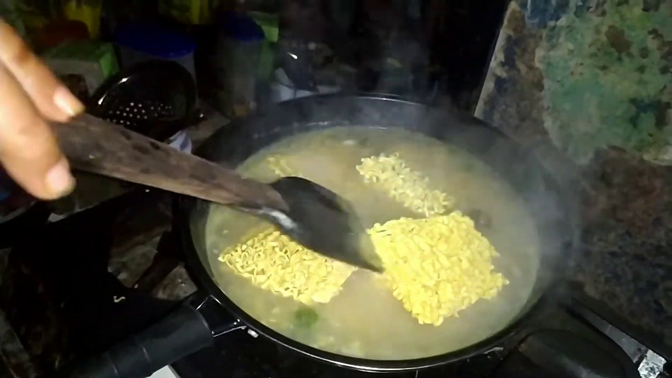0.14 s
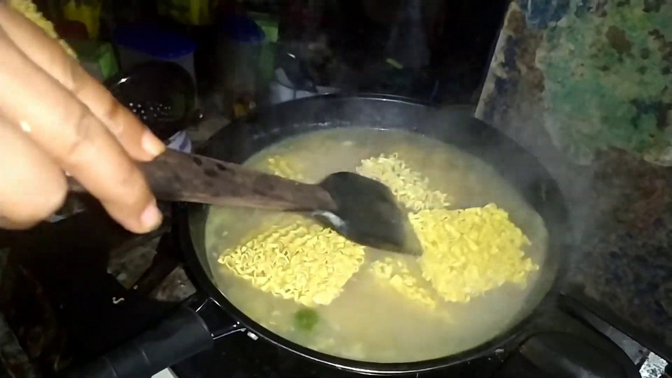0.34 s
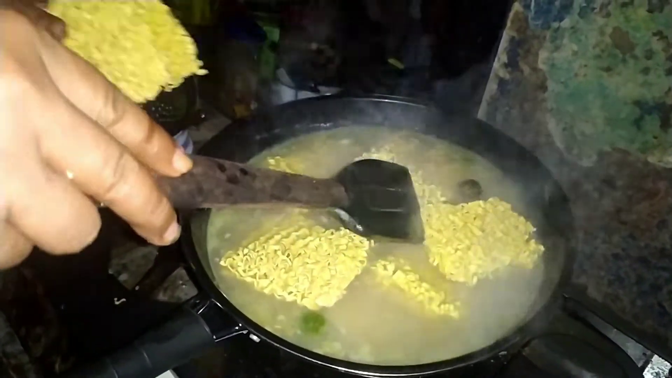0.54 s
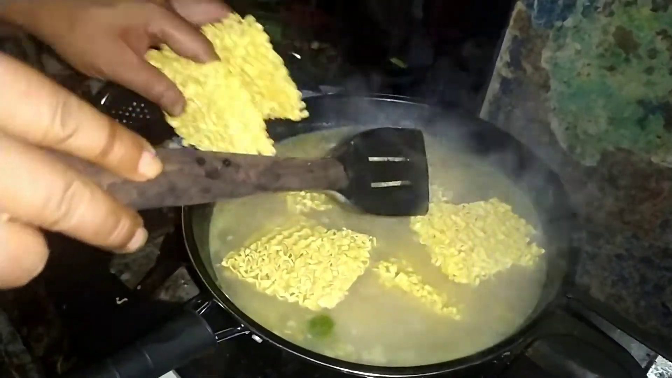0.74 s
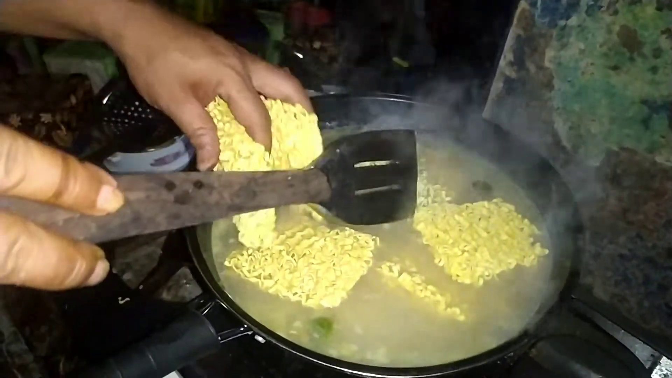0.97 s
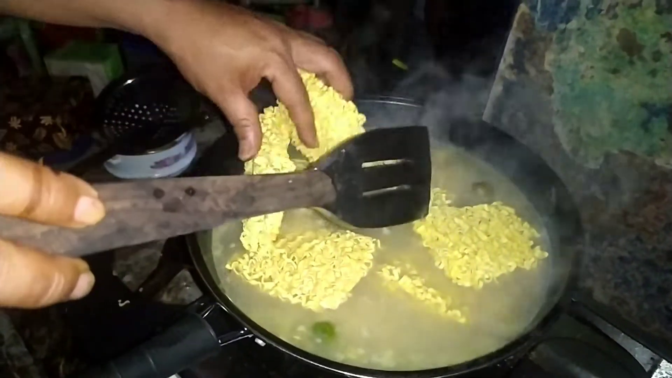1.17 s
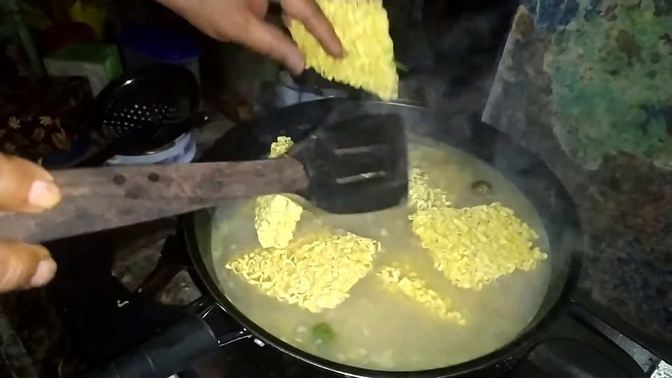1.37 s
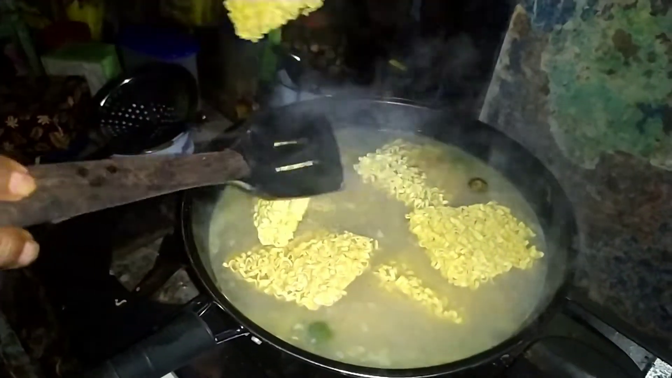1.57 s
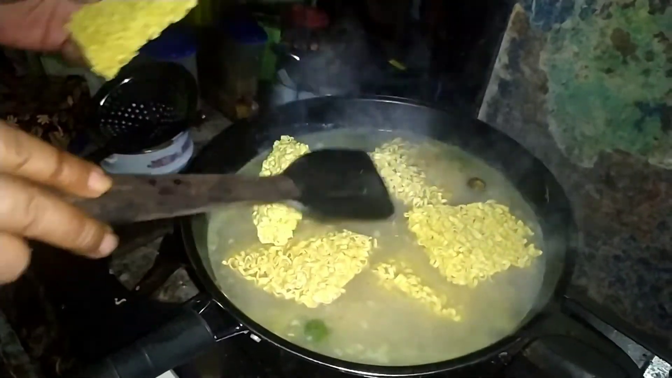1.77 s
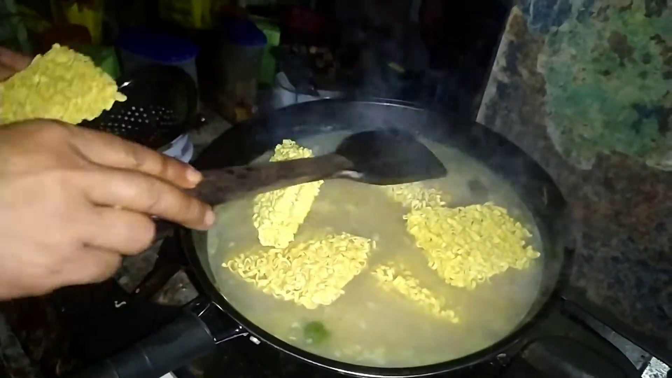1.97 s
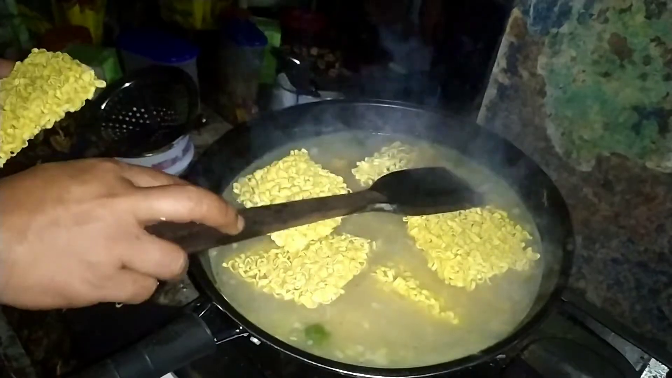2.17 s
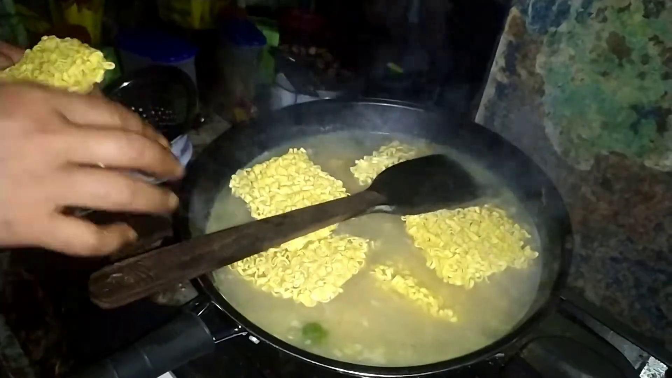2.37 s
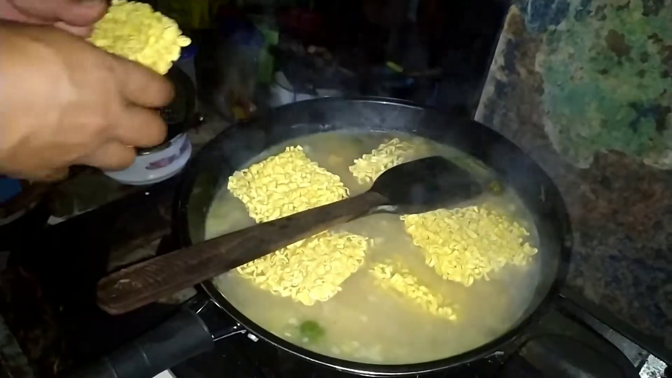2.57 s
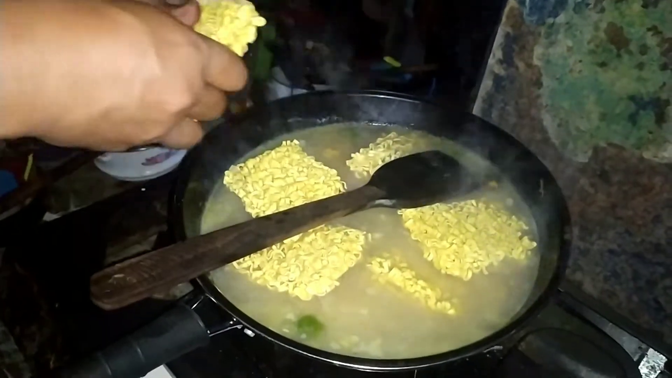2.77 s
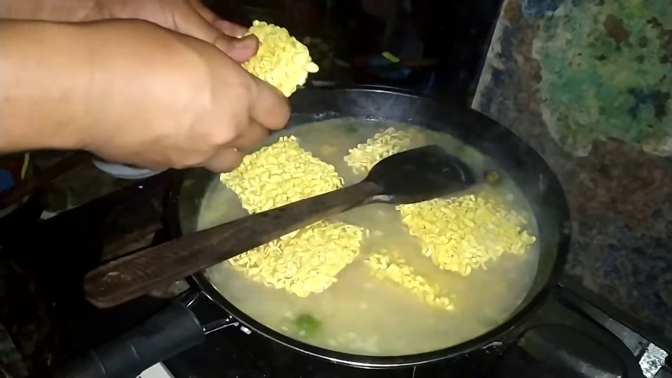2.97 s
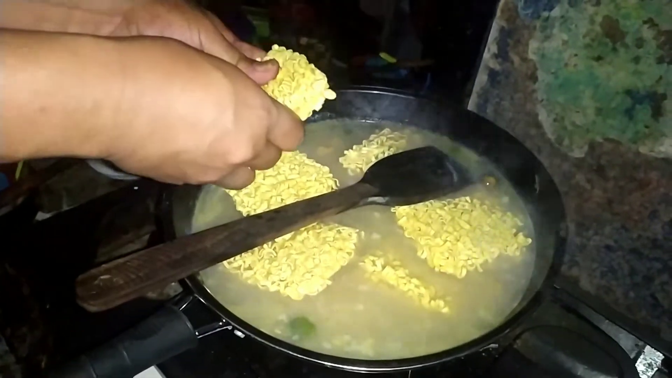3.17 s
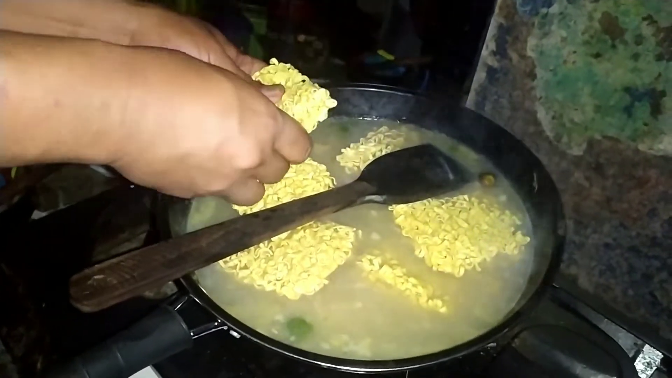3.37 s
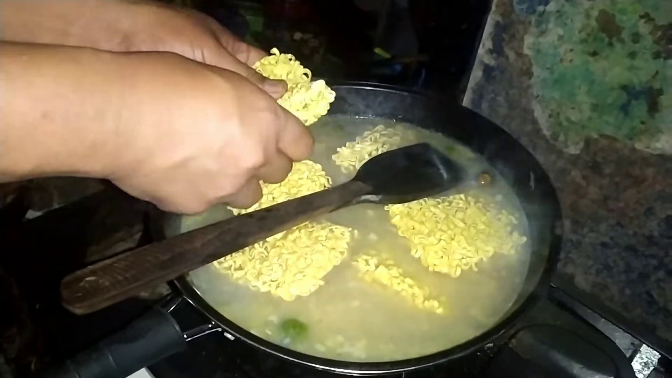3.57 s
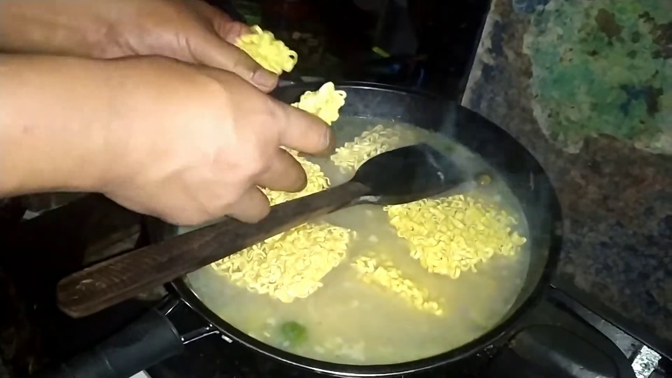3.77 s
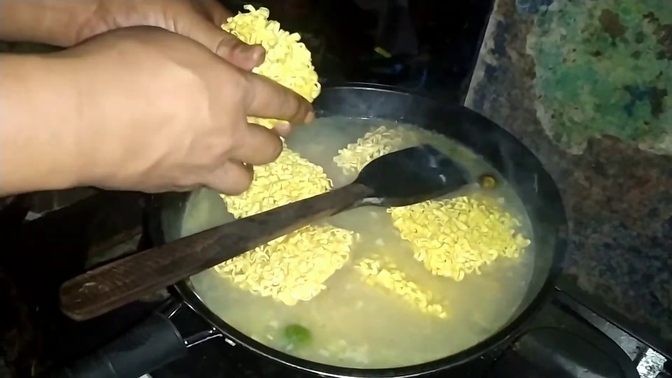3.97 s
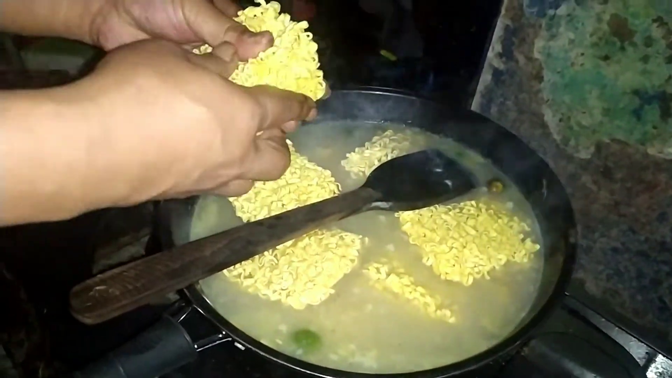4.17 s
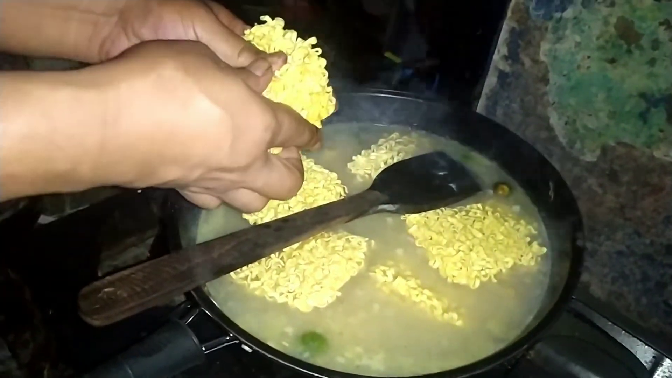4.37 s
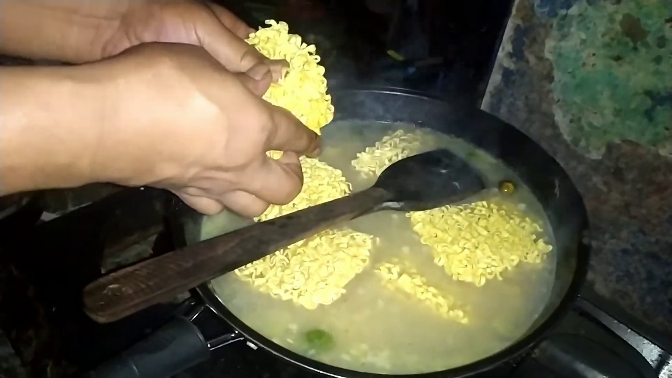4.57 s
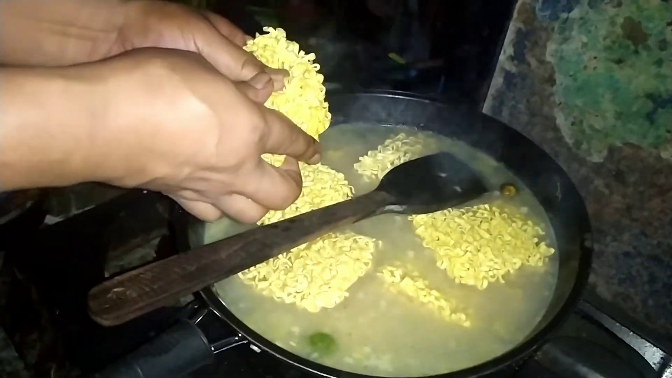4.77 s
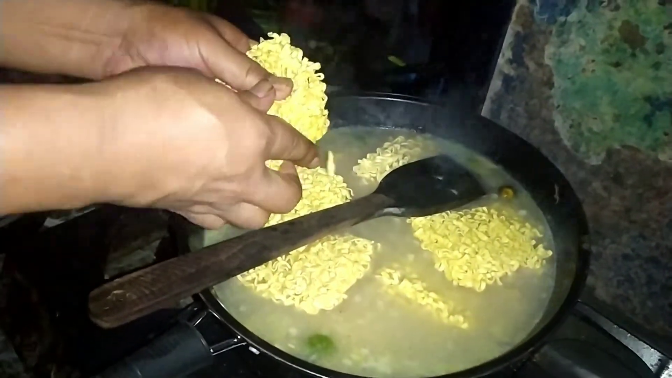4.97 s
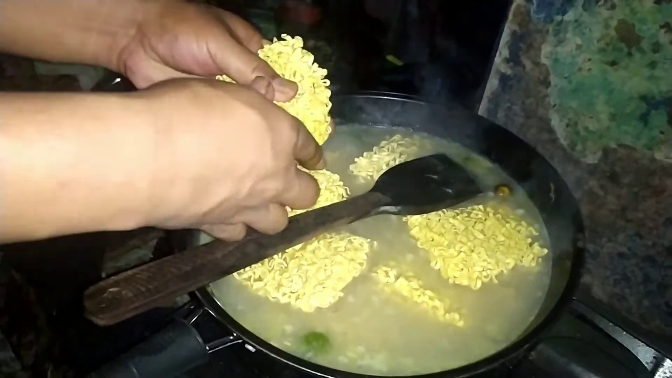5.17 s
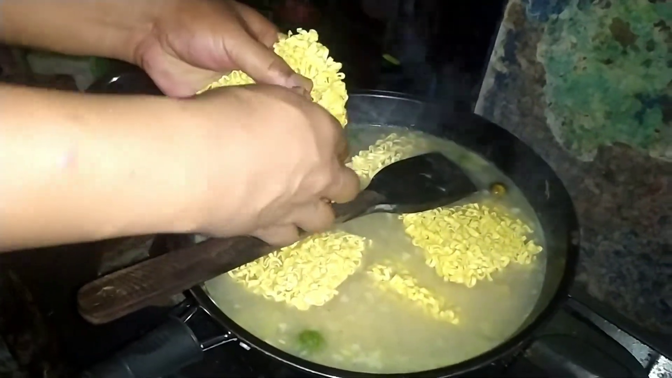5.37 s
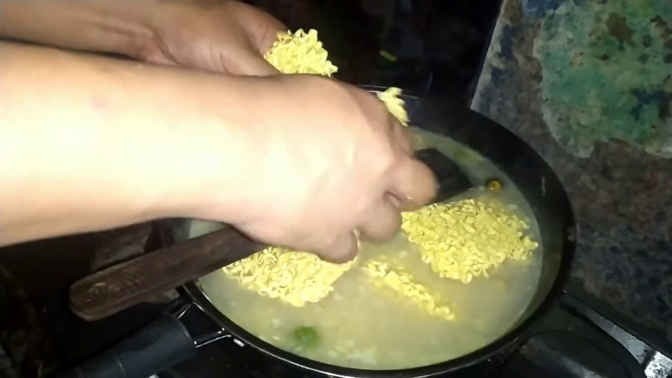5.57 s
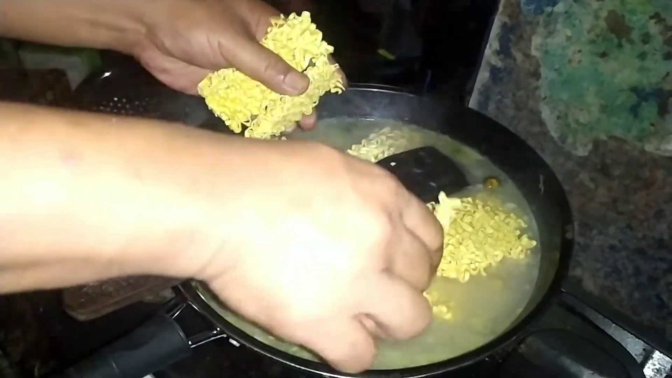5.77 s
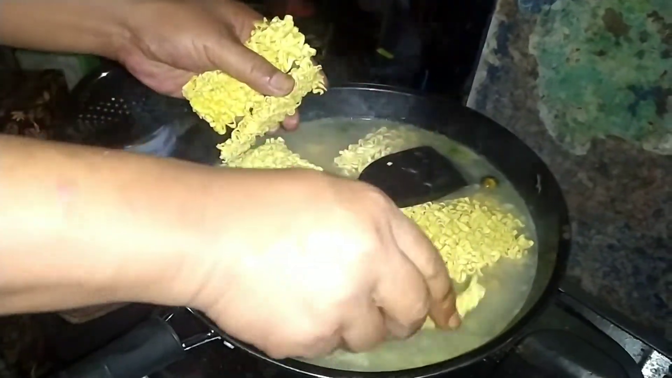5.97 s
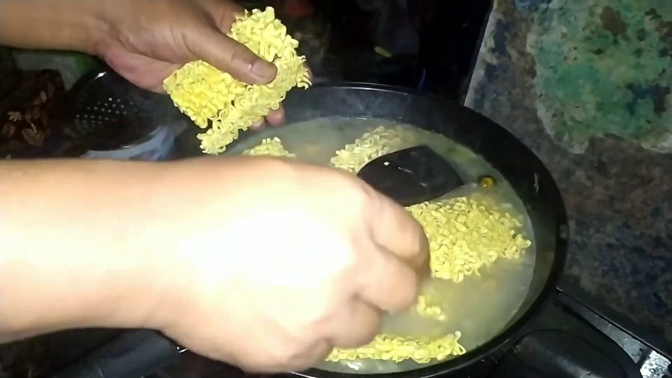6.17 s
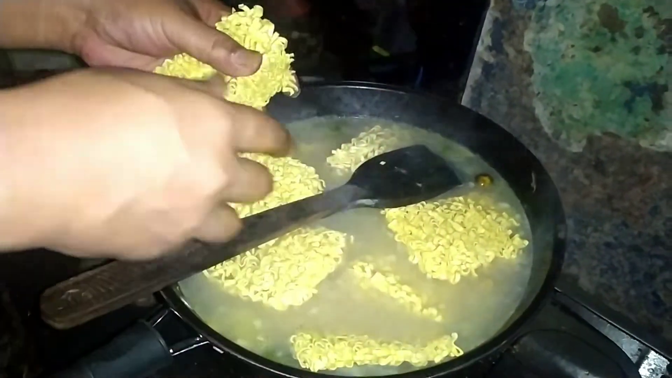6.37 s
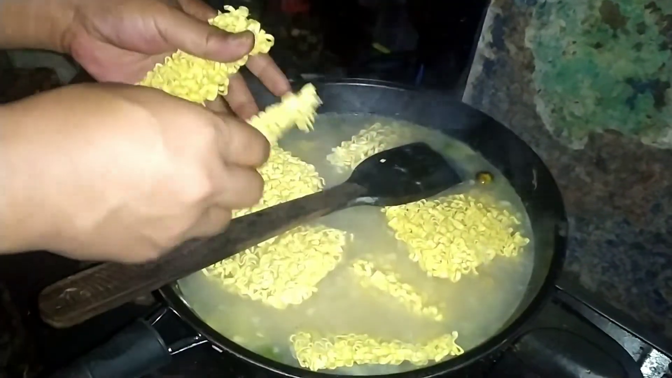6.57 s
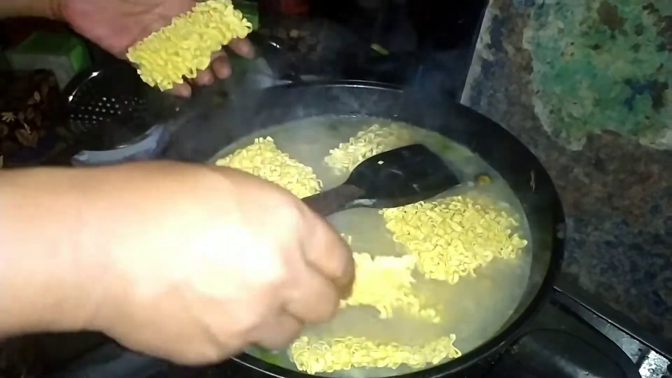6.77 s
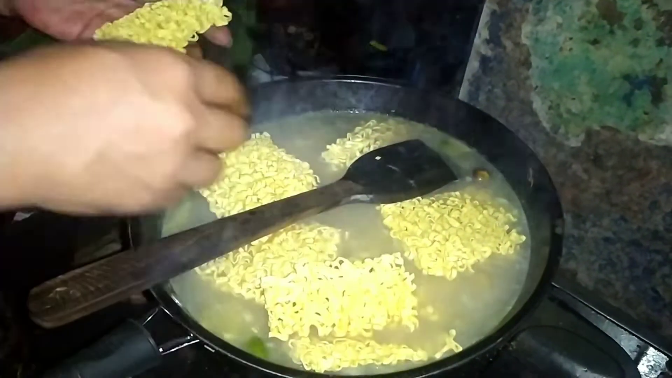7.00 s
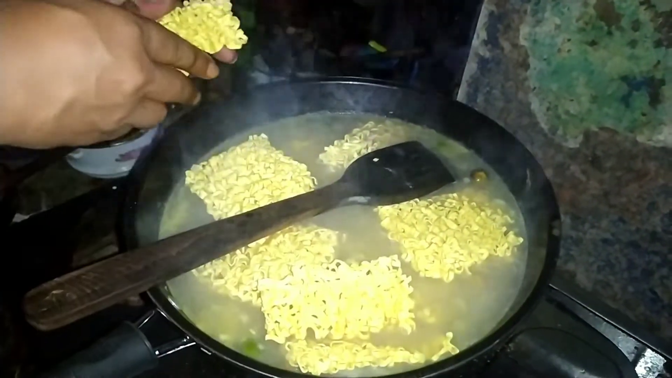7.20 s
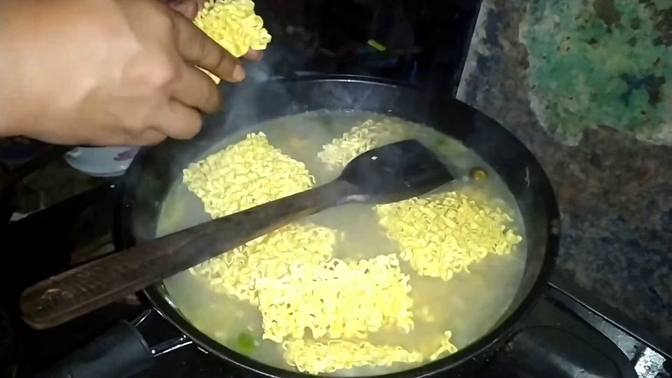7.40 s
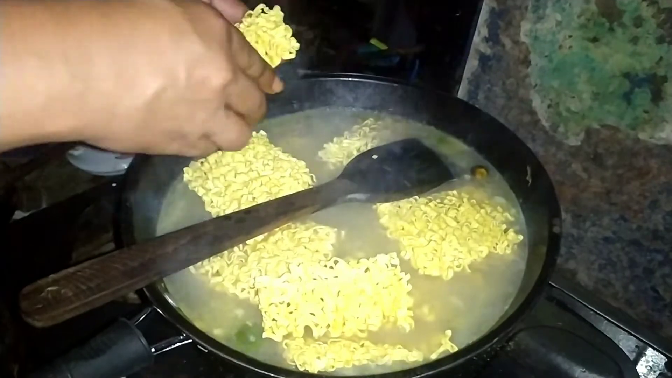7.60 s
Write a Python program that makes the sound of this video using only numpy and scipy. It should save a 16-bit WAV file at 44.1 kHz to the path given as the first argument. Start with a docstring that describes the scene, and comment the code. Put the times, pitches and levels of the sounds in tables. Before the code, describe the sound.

A close handheld microphone in a small hard-walled kitchen picks up a soft gas flame rumble, thin hiss and tiny broth bubbles. One crisp noodle snap comes early, then faint rustles and a light wooden knock on the pan. After three seconds dry noodles break in a dense, loud, bright crackling burst, with smaller breaks later and a last brittle crackle at the end.

```python
"""First a gas flame rumbles and hisses under bubbling broth and a low pan drone; then dry noodles snap.
Hands break the blocks close to a phone: bright noise bursts per strand, random fine crackle between them.
A wooden spatula knocks and drags: impulses and uneven noise ring decaying modes of wood and pan.
Bubbles are rising, fading tones; flame and hiss are fluttering noise bands; kitchen walls add a short tail."""
import sys
import numpy as np
from scipy import signal
from scipy.fft import rfft, irfft, next_fast_len
from scipy.io import wavfile
from scipy.ndimage import uniform_filter1d

SR = 44100
rng = np.random.default_rng(int(sys.argv[2]) if len(sys.argv) > 2 else 0)


def generate_wav(signal):
    """Clip the signal to [-1, 1] and save it as 16-bit WAV at the path in sys.argv[1]."""
    frames = np.transpose(np.atleast_2d(signal))
    scaled = np.clip(frames, -1, 1) * 32767
    pcm = np.round(scaled).astype(np.int16)
    wavfile.write(sys.argv[1], SR, pcm)


N = 337012
LONG = next_fast_len(N)

# Strands that snap singly, and a few faint ticks of the spatula. Each row: start in seconds,
# nominal peak in dB, thickness as relative dB near 2.4 kHz, brightness as relative dB near 13 kHz.
SNAPS_AND_TICKS = [(0.6144, -20.5, -7, -5.5), (1.1456, -51, 14, -10), (1.1958, -50, 10, -4),
                   (1.3064, -48, -10, -9), (1.3173, -47.5, 15, -10), (1.3472, -43, 4.0, -13),
                   (1.7822, -45, 0, -11), (2.9385, -46.5, 4.0, -5), (3.014, -36, 8.0, -6),
                   (3.031, -38.0, -1.0, 7.0), (3.0391, -35, -1, 0.0), (3.0441, -32.5, -6, -6),
                   (3.2271, -28.5, -7, -3), (3.2385, -27.0, -4, -2), (3.268, -38, -3.0, 4.0),
                   (3.2787, -23.5, -6, 2.0), (3.2994, -31.5, 4, 2), (3.3173, -29, 2.0, 0.0),
                   (3.3221, -19.5, -9, 5.0), (3.3285, -35, -9, -1.0), (3.3595, -33.0, 1, -4),
                   (3.3798, -28.5, 6, 1), (3.3935, -25.5, 11, 4), (3.402, -27.0, 2.0, 4.0),
                   (3.4047, -15.5, 1.5, 9), (3.4073, -18, -1.5, 2), (3.41, -17.5, 4, 6),
                   (3.413, -19, -1, 3), (3.415, -14.5, -1, 4), (3.4208, -10, -0.5, 13.5),
                   (3.4289, -30, 1, 8), (3.4866, -31, 5, 9), (3.5063, -38, 6, 7), (3.5403, -39, -3, 9),
                   (4.0377, -46.0, 0, -3.0), (4.0848, -41.0, 18, -1), (4.088, -45, 18, -12.0),
                   (4.1596, -41.0, 7, -1.0), (4.458, -48, 10, 0), (4.4717, -29.5, 2, 6),
                   (4.485, -38, 3, 5.0), (4.7378, -50.0, 5.0, -2), (4.7529, -50.0, -3.0, 1.0),
                   (4.7554, -24.5, -2, 2.0), (4.779, -34, -4, 8), (4.7991, -24, 1, 3.0),
                   (4.8067, -21, -14.0, 13), (4.8398, -29.5, -1, 3), (4.871, -35.5, 6.5, 2.5),
                   (4.885, -37.5, -2, 7.0), (4.897, -44, -3, 4), (4.9783, -48, 12, 13),
                   (4.9898, -35.5, -4, 7.0), (5.1357, -33.5, -7, 10), (5.1415, -34.0, 4, 6),
                   (5.3168, -42, -4.0, 8.0), (5.3208, -40.5, 2, 4), (5.347, -46, 9, 0),
                   (5.4184, -21.5, -14, 14), (5.4275, -42, -3.0, 13), (5.4524, -48, -11, -2.0),
                   (5.4559, -29, 0, 0), (5.4643, -15, 4.5, 15), (5.4736, -32, -4.0, 12.0),
                   (5.4774, -21.5, 1, 4.0), (5.49, -20.5, -6, 13), (5.4896, -19, -6.0, 15),
                   (5.4979, -24, -10, 2.0), (5.501, -27, -2, 7), (5.5147, -23, -8, 4),
                   (5.5248, -21.5, -2, 13), (5.8043, -44, 1.0, 13), (6.1062, -42.5, -17, 3.0),
                   (6.1367, -37.5, 10, -6), (6.1542, -45, 4, 0), (6.9363, -47, 9, 1),
                   (7.0078, -46, 11, -4.0), (7.4419, -41, 1, 6.0), (7.4492, -36.5, 1, 5.0),
                   (7.4668, -28, 1.5, 4), (7.4867, -34, 3.0, 16), (7.5077, -38, 9, 7),
                   (7.5166, -37, 4.0, 6.0), (7.536, -40, -3, 1)]
# Spectrum of breaking noodle. Each row: frequency in Hz, relative density in dB per Hz.
NOODLE_SPECTRUM = [(410, -60), (700, -19.5), (1990, -19), (2700, -7), (4010, -8.5), (4340, -5), (9850, 4),
                   (12800, -0.5), (15400, -4), (16500, -27)]
# Straining hands make the block crackle. Each row: start in seconds, hold in seconds,
# level in dB before the body gain, body gain in dB.
CRUNCHES_BY_HAND = [(0.986, 0.0084, -57.5, 2), (1.123, 0.23, -60, 2.5), (1.672, 0.035, -63, 6.5),
                    (3.009, 0.032, -48, -4), (3.262, 0.105, -42.5, -4.5), (3.39, 0.0088, -41, 5),
                    (3.424, 0.14, -56, -4), (4.034, .002, -56, 8.5), (4.083, .002, -51, 5.5),
                    (4.157, 0.024, -48.5, 6), (4.23, 0.23, -68.5, 0), (4.768, 0.11, -56, -16),
                    (5.454, 0.06, -38, -5.5), (6.12, 0.02, -63, 12.5), (7.441, 0.069, -51, -3.5)]
# Wood meets the pan. Each row: start in seconds, strike drive in dB,
# pan drive in dB re strike, tick drive in dB re strike.
SPATULA_KNOCKS = [(1.348, -54, -2, 13), (2.233, -56, -8, 8), (2.2419, -38.5, -11, 7),
                  (2.278, -63.5, 13.5, -10), (2.4337, -48, -14, 5.5), (2.438, -55.5, 11.5, 7),
                  (2.507, -67, 13.5, -5), (6.124, -53.5, -11, -11), (6.95, -59.5, 7, -10)]
# Modes of the wood. Each row: frequency in Hz, relative level in dB, t60 in seconds.
WOOD_MODES = [(640, -5, 0.05), (960, 8, 0.035), (1400, 4, 0.016), (2390, -1, 0.022)]
# Modes of the pan. Each row: frequency in Hz, relative level in dB, t60 in seconds.
PAN_MODES = [(140, -7, .15), (175, 2, .4), (245, -5, .15)]
# Drags on the pan. Each row: start in seconds, hold in seconds, drone level in dB.
PAN_DRAGS = [(0.18, 0.38, -62), (1.15, 0.044, -51.5), (1.332, 0.016, -49.5), (2.426, 0.025, -47.5)]
# Bubbles stirred up in the broth. Each row: start in seconds, starting pitch in Hz, level in dB.
STIRRED_BUBBLES = [(.153, 890, -51.5), (.19, 700, -57), (.222, 780, -50), (.262, 1010, -57),
                   (.292, 1090, -55), (.3, 1640, -51), (2.505, 1000, -52)]
# Spectrum of flame and hiss. Each row: frequency in Hz, relative density in dB per Hz.
STOVE_SPECTRUM = [(21, -23), (36, 5.5), (65, -2), (139, 2), (238, -6), (292, -8), (406, -8.5), (462, -10.5),
                  (498, -8.5), (873, -13), (1280, -19), (11200, -25.5), (16000, -36)]
# Left-right likeness of the stove. Each row: frequency in Hz, correlation from 0 to 1.
STOVE_LIKENESS = [(40, 0.74), (130, 0.98), (290, 0.9), (640, 0.84), (1400, 0.45), (3000, 0)]
# Room tail by band. Each row: centre in Hz, t60 in seconds, relative level in dB.
ROOM_BANDS = [(318, 0.22, -59), (1610, 0.21, -23), (3600, 0.18, -27), (6800, 0.21, -28.5),
              (14300, 0.19, -30.5)]
# Steep upper limit of the sound. Each row: frequency in Hz, gain in dB.
TREBLE_LIMIT = [(15450, 0), (15650, -20)]

SCATTER_DB = 1.0  # random spread of each snap's level per side
ECHO_S, ECHO_DB = 0.0027, -13  # broth and pan mirror each snap
CRUNCH_ATTACK_S, CRUNCH_FADE_DB_PER_S = 0.0028, 359
DRAG_ATTACK_S, DRAG_FADE_DB_PER_S = 0.0096, 86
SIMMER_COUNT, SIMMER_DB = 300, -70  # small random bubbles, lowest level
FLAME_DB, HISS_DB = -59.5, -64.5
PAN_ROOM_DB = -5  # pan and broth into the room, re noodles
RIGHT_DB = 2.2  # right re left
TOP_HZ = 16600


def snaps(rise_s=0.0004, fall_s=0.0014, crack_s=0.00012, crack_db=-4, after_s=0.005, after_db=-16,
          spike_db=1.7, tint_db=1.5, shared_power=0.6, lag_samples=8):
    """A snap or tick is a few spiky fractures and a shiver, with its own colour and place."""
    out, size, lead = np.zeros((2, N)), 1024, 110  # lead in samples
    t = (np.arange(size) - lead) / SR
    late = np.maximum(t, 0)
    decay = np.exp(-late / fall_s) + undb(after_db) * np.exp(-late / after_s)
    envelope = np.exp(np.minimum(t, 0) / rise_s) * decay
    envelope += undb(crack_db) * np.exp(-np.abs(t) / crack_s)
    loudest = np.sqrt(uniform_filter1d(unit(envelope) ** 2, size=26).max())
    for start_s, db, thick_db, top_db in SNAPS_AND_TICKS:
        tint = list(zip(1500 * 1.27 ** np.arange(11), tint_db * rng.standard_normal(11)))
        both, *own = rng.standard_normal((3, size))
        noise = np.sqrt(shared_power) * both + np.sqrt(1 - shared_power) * np.array(own)
        fractures = envelope * undb(spike_db * rng.standard_exponential(size)) * noise
        fractures[1] = np.roll(fractures[1], rng.integers(-lag_samples, lag_samples + 1))
        tilt = [(2400, thick_db), (7500, 0), (13000, top_db)]
        gains_db = shape(NOODLE_SPECTRUM, size) + shape(tint, size) + shape(tilt, size)
        burst = unit(irfft(rfft(fractures) * causal(gains_db)))
        side_db = db + SCATTER_DB * rng.standard_normal((2, 1))
        add(out, burst / loudest * undb(side_db), start_s + rise_s - lead / SR)
    return out + undb(ECHO_DB) * np.roll(out, int(ECHO_S * SR), axis=1)


def crackle(rate_per_s=1500, spread_db=2.4, fall_s=0.0006, split_hz=9000):
    """Fine strands give way at random, a few louder; body gain weights the part under the split."""
    cracks = (rng.random(N) < rate_per_s / SR) * undb(spread_db * rng.standard_exponential(N))
    envelope = decaying(cracks, fall_s)
    fine = envelope * colour(rng.standard_normal((2, N)), NOODLE_SPECTRUM)
    body = signal.sosfilt(signal.butter(2, split_hz, fs=SR, output="sos"), fine)
    total = 0
    for start_s, hold_s, db, body_db in CRUNCHES_BY_HAND:
        gain = swell(start_s, hold_s, db, CRUNCH_ATTACK_S, CRUNCH_FADE_DB_PER_S)
        total = total + (fine + (undb(body_db) - 1) * body) * gain
    return total / fine.std()


def spatula(wood_db=-6.0, pan_db=-2.0, rattle_s=0.0013, scrape_db=-14.0):
    """Knocks rattle, tick and ring wood and pan; drags drone by uneven slips and scrape dully."""
    start_s, db, low_db, hard_db = np.transpose(SPATULA_KNOCKS)
    blows = np.zeros((3, N))
    blows[:, (start_s * SR).astype(int)] = undb([db, db + low_db, db + hard_db])
    rattle = decaying(blows[2], rattle_s) * rng.standard_normal(N)
    tick = colour(rattle, [(300, 3), (2500, 0.0), (5500, 1.0), (11000, -9.0)])
    rub = rng.standard_normal(N) * undb(1.0 * walk(81.0))
    drone = unit(ring(rub, PAN_MODES))
    scrape = undb(scrape_db) * unit(colour(rub, [(300, -9), (700, 3), (1300, -7), (3000, -16)]))
    pressure = sum(swell(*row, DRAG_ATTACK_S, DRAG_FADE_DB_PER_S) for row in PAN_DRAGS)
    wood = undb(wood_db) * ring(blows[0], WOOD_MODES)
    pan = undb(pan_db) * ring(blows[1], PAN_MODES)
    return wood + pan + tick + (drone + scrape) * pressure


def bubbles(cycles=7.0, glide=0.25, spread_db=2.0):
    """Each bubble is a short tone rising as it fades; small ones come at random throughout."""
    chance = rng.random((SIMMER_COUNT, 3))
    small_s = chance[:, 0] * N / SR
    small_hz = 350 * 5 ** chance[:, 1]
    small_db = SIMMER_DB - spread_db * np.log(chance[:, 2])
    out, t = np.zeros(N), np.arange(1500) / SR
    for start_s, hz, db in [*STIRRED_BUBBLES, *np.c_[small_s, small_hz, small_db]]:
        turns = hz * t
        tone = np.sin(2 * np.pi * turns * (1 + glide * turns / cycles / 2))
        add(out, undb(db) * tone * np.exp(-3 * turns / cycles), start_s)
    return out


def stove(flutter_db=0.5, fizz_db=0.6):
    """Flame rumble under 2 kHz flutters by octave, mostly alike at both ports; hiss above is wide."""
    like = np.clip(shape(STOVE_LIKENESS, LONG), 0, 1)
    noise = rfft(rng.standard_normal((2, LONG)))
    mid, side = noise * np.sqrt([1 + like, 1 - like]) * undb(shape(STOVE_SPECTRUM, LONG))
    pair = np.array([mid + side, mid - side])
    edges_hz = 30 * 2 ** np.arange(11)
    hz = np.arange(LONG // 2 + 1) * SR / LONG
    bands = [irfft(pair * ((hz >= lo) & (hz < hi)), LONG)[:, :N]
             for lo, hi in zip(edges_hz, edges_hz[1:])]
    flame = sum(band * undb(flutter_db * walk(11)) for band in bands[:6])
    hiss = sum(band * undb(fizz_db * walk(3.45)) for band in bands[6:])
    return unit(flame) * undb(FLAME_DB) + unit(hiss) * undb(HISS_DB)


def room(x, gap_s=0.003):
    """Hard kitchen walls: a dense tail fading at its own rate per band, unrelated left and right."""
    size = SR // 2
    t, tail = np.arange(size) / SR, 0
    for k, (hz, t60_s, db) in enumerate(ROOM_BANDS):
        share = shape([(row[0], float(j == k)) for j, row in enumerate(ROOM_BANDS)], size)
        band = irfft(rfft(rng.standard_normal((2, size))) * share, size)
        tail = tail + undb(db) * band * 1000 ** (-t / t60_s)
    return signal.fftconvolve(x, tail * (t > gap_s), axes=1)[:, :N]


def ring(x, modes):
    """Decaying modes struck by x."""
    t = np.arange(SR // 2) / SR
    response = sum(undb(db) * np.sin(2 * np.pi * hz * t) * 1000 ** (-t / t60_s)
                   for hz, db, t60_s in modes)
    return signal.fftconvolve(x, response)[:N]


def decaying(x, fall_s):
    """Each impulse in x starts an exponential decay with this time constant."""
    return signal.lfilter([1], [1, -np.exp(-1 / (fall_s * SR))], x)


def swell(start_s, hold_s, db, attack_s, fade_db_per_s):
    """Gain that rises, holds, then fades at a steady dB rate."""
    t = np.arange(N) / SR - start_s
    fade_db = fade_db_per_s * np.maximum(t - attack_s - hold_s, 0)
    return np.clip(t / attack_s, 0, 1) * undb(db - fade_db)


def walk(rate_hz):
    """Random levels held 1 / rate_hz seconds and slewed twice; spread near 1."""
    k = int(SR / rate_hz)
    held = np.repeat(rng.standard_normal(N // k + 1), k)
    return 1.29 * uniform_filter1d(uniform_filter1d(held, k), k)[:N]


def causal(gains_db):
    """Minimum-phase filter with these gains: its response starts at once, never early."""
    ceps = irfft(gains_db * np.log(10) / 20)
    half = len(ceps) // 2
    ceps[1:half] *= 2
    ceps[half + 1:] = 0
    return np.exp(rfft(ceps))


def colour(x, points):
    """x through a spectrum of (Hz, dB) points."""
    size = next_fast_len(x.shape[-1])
    return irfft(rfft(x, size) * undb(shape(points, size)), size)[..., :x.shape[-1]]


def shape(points, size):
    """(Hz, value) points at every frequency of a transform, joined on a log axis."""
    hz, value = np.transpose(points)
    return np.interp(np.log(np.arange(size // 2 + 1) * SR / size + 1), np.log(hz), value)


def add(out, x, start_s):
    """Mix x into out at start_s."""
    i = int(start_s * SR)
    out[..., i:i + x.shape[-1]] += x[..., :N - i]


def undb(db):
    """Amplitude ratio from dB."""
    return 10 ** (np.asarray(db) / 20)


def unit(x):
    """x scaled to RMS 1 along its last axis."""
    return x / np.sqrt(np.mean(x ** 2, axis=-1, keepdims=True))


def scene():
    """Noodles and pan, direct and off the walls, over the stove."""
    noodles = snaps() + crackle()
    pan = spatula() + bubbles()
    heard = noodles + pan + room(noodles + undb(PAN_ROOM_DB) * pan) + stove()
    heard[0] = np.roll(heard[0], shift=3)  # samples; the right port is a little nearer
    return heard * undb(np.array([[-RIGHT_DB], [RIGHT_DB]]) / 2)


def record(dry):
    """Deepest bass removed, loudest peaks rounded, nothing left above about 16.6 kHz."""
    bass_cut = signal.sosfilt(signal.butter(14, 38, "high", fs=SR, output="sos"), dry)
    rounded = 0.55 * np.tanh(bass_cut / 0.55)
    top_cut = signal.ellip(10, 0.2, 80, TOP_HZ, fs=SR, output="sos")
    return signal.sosfilt(top_cut, colour(rounded, TREBLE_LIMIT))


dry = scene()
out = record(dry)
generate_wav(out)
```